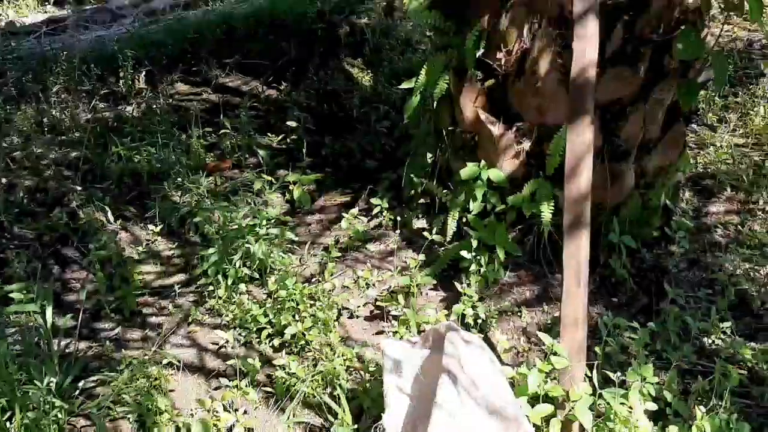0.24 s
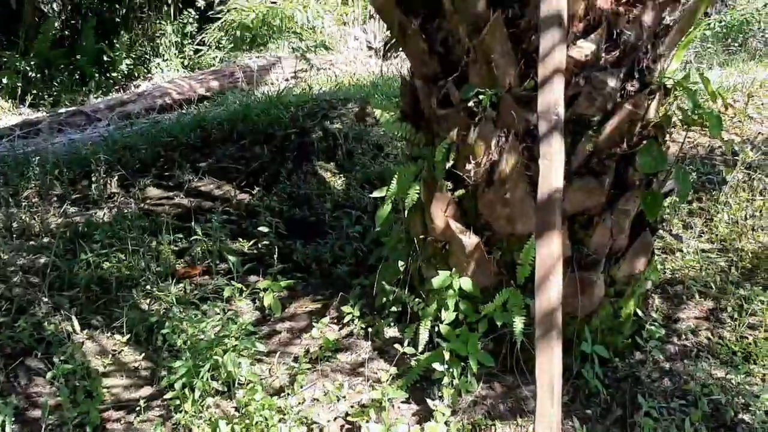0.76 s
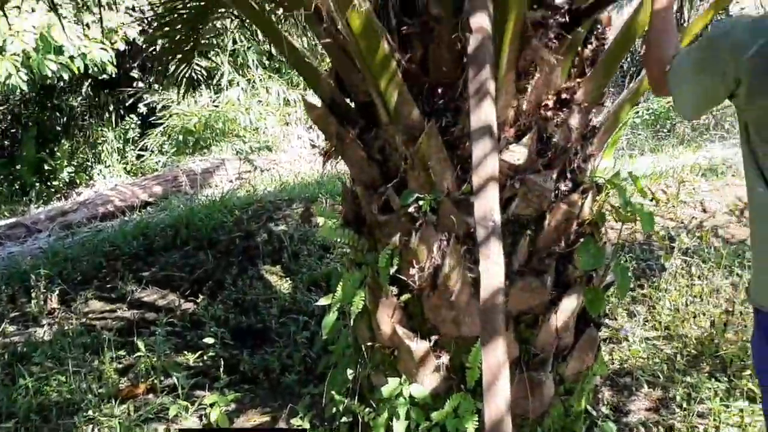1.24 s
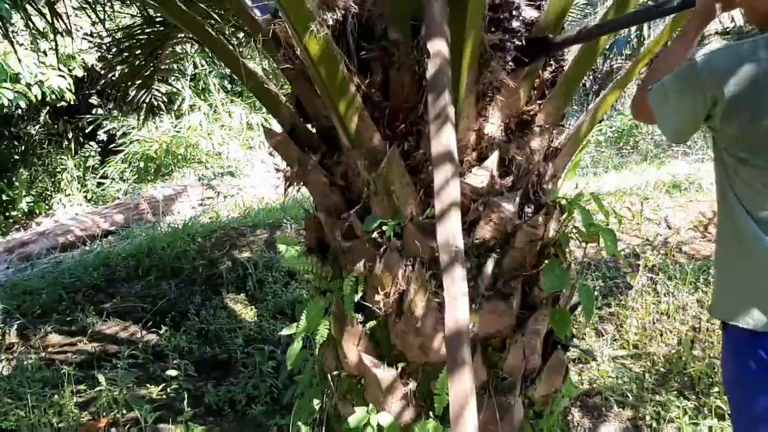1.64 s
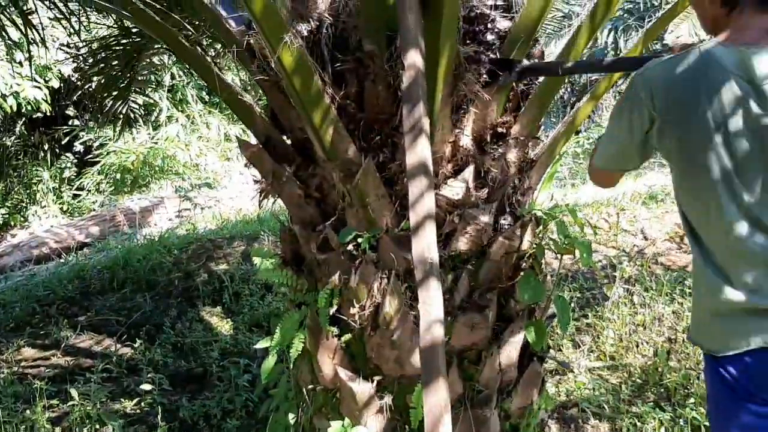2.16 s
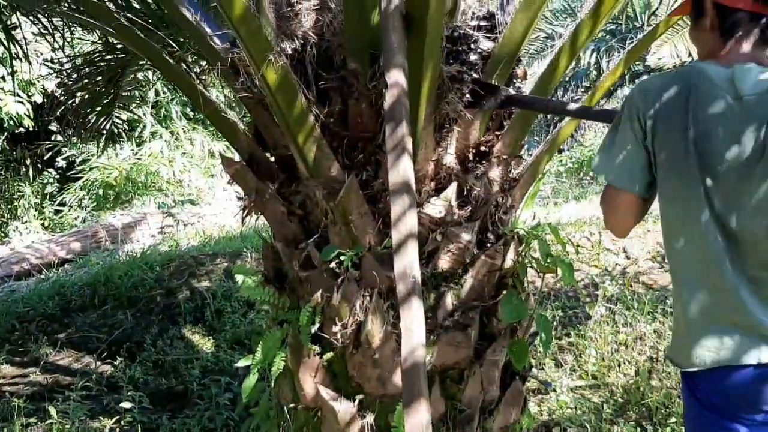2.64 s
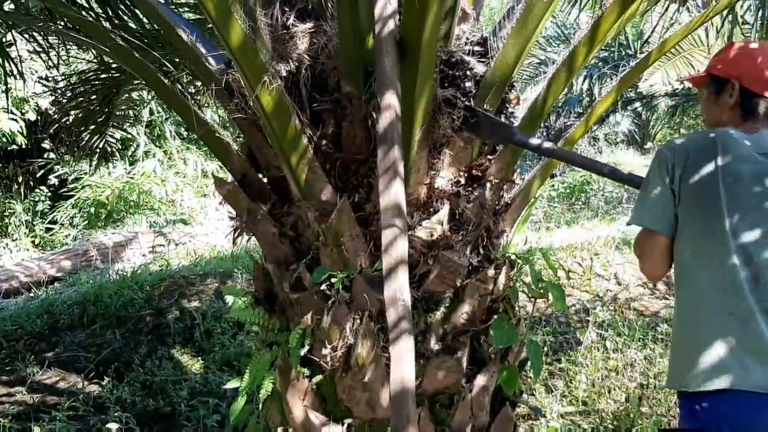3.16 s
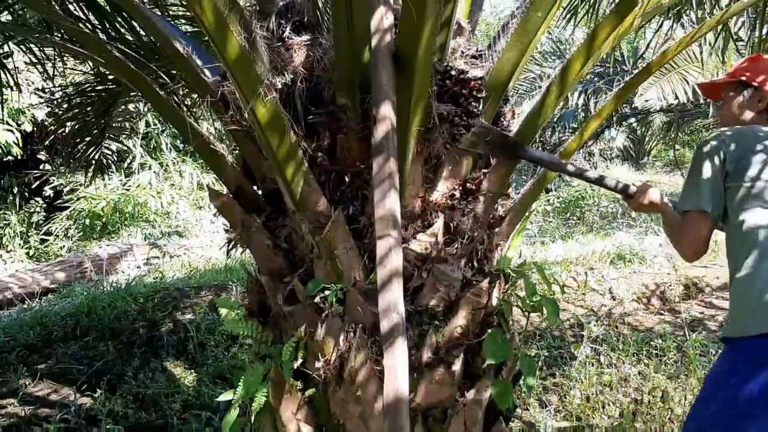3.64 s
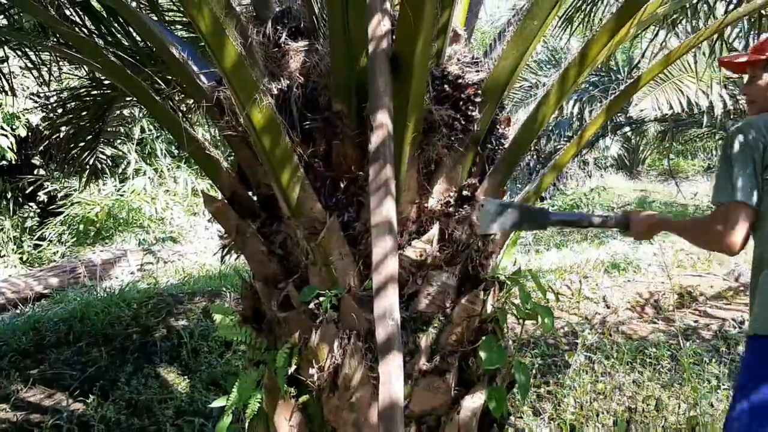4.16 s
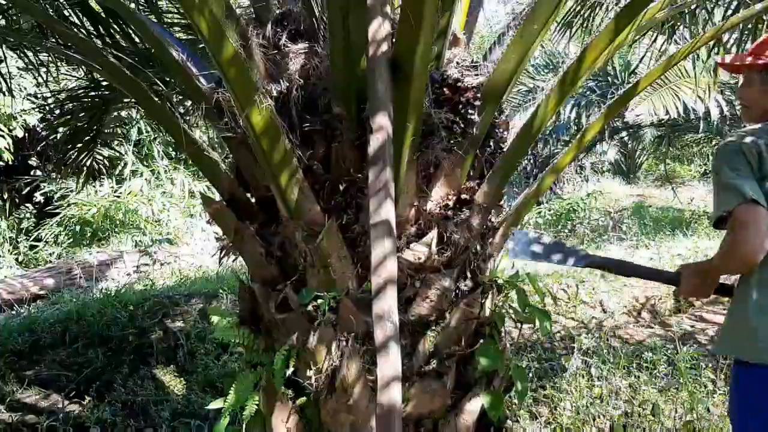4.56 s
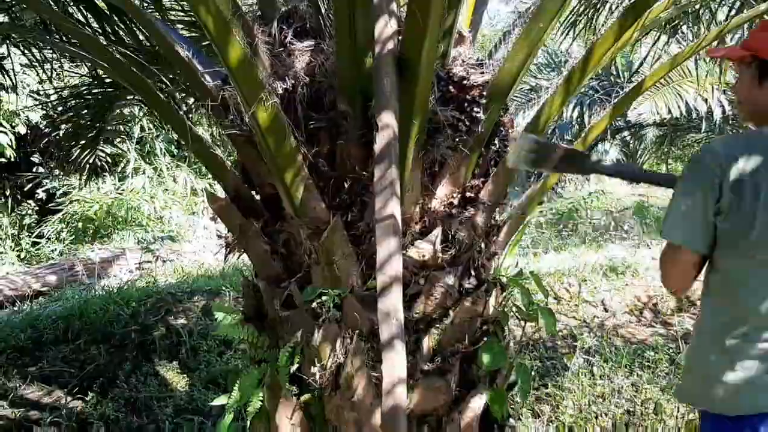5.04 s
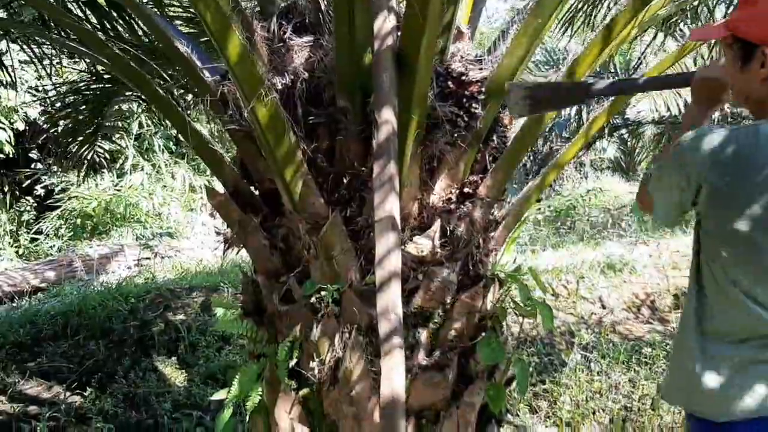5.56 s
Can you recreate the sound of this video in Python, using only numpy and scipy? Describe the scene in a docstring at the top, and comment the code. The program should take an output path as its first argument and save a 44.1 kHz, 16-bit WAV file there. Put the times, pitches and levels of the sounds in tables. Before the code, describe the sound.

Stereo outdoor sound from close to the work, insects and air leaning left. Cicadas buzz steadily over a low faraway motor that changes speed. A rough scrape comes first, then short creaks, dull thuds and clusters of sharp woody knocks with crackling fibres and shaken leaves. One hard crack follows at three and a half seconds; afterwards there are soft rustles and distant falling bird calls.

```python
"""An oil-palm plantation, heard from close by the work. First the faint insect tail of an earlier scene, noise
bands and a line, dies out. After a short gap the scene changes and the plantation cuts in at once: cicadas as
throbbing noise bands over the hiss of the air, a small distant engine as orders of its firing rate, and a far
bird's falling whistles with an echo. Close by, a steel chisel on a pole scrapes, creaks and knocks the frond
bases: clicks and slips shake filtered wood and ringing modes, while the shaken fronds rustle as dense filtered
grains."""
import sys
import numpy as np
from scipy import signal
from scipy.fft import rfft, irfft, next_fast_len
from scipy.io import wavfile
from scipy.ndimage import uniform_filter1d

SR = 44100
rng = np.random.default_rng(int(sys.argv[2]) if len(sys.argv) > 2 else 0)


def bounce(signal):
    """Save signal as a 16-bit WAV file at the path given by the first command-line argument."""
    frames = np.transpose(np.atleast_2d(signal))
    limited = np.clip(frames, -1, 1)
    pcm = np.round(limited * 32767).astype(np.int16)
    wavfile.write(sys.argv[1], SR, pcm)


N = 255780

# colour of the low shuffle of stalks, also heard under the creaks: hz, relative_density_db
SHUFFLE = [(100, -22.5), (200, 1), (350, 2.5), (800, -5.5), (1400, -18), (2500, -14)]


def amp(db):
    """Decibels to gain."""
    return 10 ** (np.asarray(db) / 20)


def evened(x):
    """Scaled to rms 1 over all channels."""
    return x / np.sqrt(np.mean(x ** 2) + 1e-30)


def read(points, hz):
    """A spectrum table read on a log-frequency axis."""
    f, value = np.transpose(points)
    return np.interp(np.log(hz + 1), np.log(f + 1), value)


def curve(rows, silent=None):
    """Columns of a table at every sample; silent is the value outside its times."""
    s, *columns = np.transpose(rows)
    return [np.interp(np.arange(N) / SR, s, c, silent, silent) for c in columns]


def sides(lr_db):
    """Left and right gains for a left-minus-right level difference."""
    return amp(np.array([[.5], [-.5]]) * lr_db)


def slow(seconds):
    """Slow random drift of rms 1: noise averaged twice over a window of this length."""
    size = round(seconds * SR)
    once = uniform_filter1d(rng.standard_normal(N), size)
    return evened(uniform_filter1d(once, size))


def band(x, hz, width):
    """A band-pass resonance applied twice."""
    sos = signal.butter(1, [hz - width / 2, hz + width / 2], "bandpass", fs=SR, output="sos")
    return signal.sosfilt(np.vstack([sos, sos]), x)


def colour(x, spectrum):
    """Causal minimum-phase filter of the given spectrum, with unit energy."""
    hz = abs(np.fft.fftfreq(4096, 1 / SR))
    log_gain = np.log(amp(np.maximum(read(spectrum, hz), -100)))
    phase = -signal.hilbert(log_gain).imag
    taps = np.fft.ifft(np.exp(log_gain + 1j * phase)).real[:2048]
    return signal.oaconvolve(x, taps / np.linalg.norm(taps))[:N]


def two_mics(first, second):
    """The microphones agree in the bass; higher up the right one hears more of the second signal."""
    # likeness of the left and right microphones: hz, likeness (0 to 1)
    same_table = [(60, .95), (300, 0.88), (700, 0.9), (1400, 0.4), (3000, 0.02), (16000, 0.025)]
    size = next_fast_len(N)
    same = np.clip(read(same_table, np.fft.rfftfreq(size, 1 / SR)), 0, 1)
    right = irfft(same * rfft(first, size) + np.sqrt(1 - same ** 2) * rfft(second, size), size)
    return np.array([first, right[:N]])


def tail():
    """A thin cricket line, wider insect bands and a little rumble, dying out."""
    # fading of the tail: start_s, level_db
    fade = [(0, -78), (.105, -91), (.138, -105)]
    # its noise bands: centre_hz, width_hz, level_db under the fade
    tail_bands = [(5500, 540, 8), (4650, 7600, -2), (1510, 440, -12), (67, 130, -18)]
    # its cricket line: pitch_hz, amplitude_db under the fade
    tail_line = (3140, 0)
    line_hz, line_db = tail_line
    bands = sum(amp(db) * evened(band(rng.standard_normal((2, N)), hz, w)) for hz, w, db in tail_bands)
    line = amp(line_db) * np.sin(2 * np.pi * line_hz * np.arange(N) / SR)
    return (bands + line) * amp(curve(fade, -200)[0])


def chorus():
    """The hiss of the air, with many cicadas on top fused into throbbing noise bands."""
    # colour of the plantation air: hz, relative_density_db
    air = [(20, -63), (45, -10), (130, -12.5), (214, -18), (450, -27), (1000, -26), (1650, -20.5),
           (2300, -24.5), (3100, -18.5), (3900, -12.5), (4600, -18), (5300, -32), (6400, -13.5), (7500, -6),
           (8800, -37), (11400, -13.5), (16000, -61)]
    # cicada bands: centre_hz, width_hz, level_db before throb, left_right_db, throb_db per unit of throb
    cicadas = [(3290, 530, -69, -3, 3.5), (5570, 330, -58, -9, 0), (7480, 820, -49, -2, 1.3),
               (11380, 1400, -72, 12.5, 3.5), (15400, 3000, -57, -3, 1.5)]
    air_db, throb_hz = -56, 25  # the throb rate wanders around this
    hiss = [colour(rng.standard_normal(N), air) for _ in "lr"]
    out = amp(air_db) * sides(-8.0) * two_mics(*hiss)
    turns = np.cumsum(throb_hz * (1 + 0.0509 * slow(0.231))) / SR
    swell = np.cos(2 * np.pi * turns + .9 * slow(.1))
    throb = swell + .8 * np.cos(4 * 2 * np.pi * turns)  # four pulses in each swell
    waver_db = .8  # singers join and drop out
    for hz, width, db, lr_db, throb_db in cicadas:
        choir = evened(band(rng.standard_normal((2, N)), hz, width))
        level_db = db + throb_db * throb + waver_db * slow(0.079)
        out = out + choir * sides(lr_db) * amp(level_db)
    return out


def sweller():
    """A noise band just under the second cicada band, rising and sinking seven times a second."""
    centre_hz, width_hz, level_db, left_right_db = 5190, 440, -64.5, -8
    swells_per_s, crest_s, depth_db = 7.0, 5.335, 5.5
    swell = np.cos(2 * np.pi * swells_per_s * (np.arange(N) / SR - crest_s))
    hiss = evened(band(rng.standard_normal((2, N)), centre_hz, width_hz))
    return hiss * sides(left_right_db) * amp(level_db + depth_db * swell)


def engine():
    """One dull thump a firing, its tone rising with speed; at idle every second firing is weak."""
    # the distant engine: start_s, firings_per_s, level_db scaling all its orders
    running = [(0.19, 16.58, -65), (0.45, 13.03, -66), (0.62, 12.27, -61), (0.72, 16.72, -59),
               (0.85, 19.63, -58), (1.4, 21.6, -59), (1.8, 20.96, -59), (3.0, 22.91, -62),
               (3.4, 21.58, -62), (3.75, 21.44, -58), (3.95, 23.65, -54), (4.3, 23.58, -54),
               (4.45, 25.66, -56), (4.85, 25.28, -55), (5.0, 23.02, -60), (5.15, 23.42, -58),
               (5.3, 25.42, -61), (5.4, 25.57, -59), (5.55, 23.72, -57), (5.8, 21.47, -54)]
    rate, level_db = curve(running)
    turns = np.cumsum(rate * (np.arange(N) >= .19 * SR)) / SR
    tone_hz = np.maximum(4.56 * rate, 82)
    drift = 1.3 + .4 * slow(.15)  # radians: a slow random drift of phase shared by all orders
    second_db = -11.5 + 2.0 * (rate - 22.5)  # the second order grows stronger as the engine runs faster
    second_phase = 2 * 2 * np.pi * turns + drift + 0.61
    thumps = amp(second_db + 2.5 * slow(0.096)) * np.cos(second_phase)
    for k in range(3, 11):
        shape_db = -45.0 * np.log2(k * rate / tone_hz) ** 2
        order_gain = amp(np.maximum(shape_db, -19.0) + 1.67 * slow(0.11))
        thumps += order_gain * np.cos(k * 2 * np.pi * turns + drift)
    weak = np.clip((16.5 - rate) / 5.3, 0, .6)
    thumps *= (1 + weak * np.cos(np.pi * turns)) * amp(level_db + 1.0 * slow(0.011))
    return two_mics(thumps, np.roll(thumps, 110)) * sides(-3.0)


def crackle(per_s, spread_db):
    """Two related click trains of rms 1: the same slips, with their own signs; a positive spread_db makes a few
    slips large, a negative one makes a few small."""
    happens = rng.random(N) < per_s / SR
    size = amp(spread_db * np.minimum(rng.exponential(1, N), 5)) * happens
    smear = np.exp(-np.arange(40) / 5.5)
    return evened(signal.oaconvolve(size, smear)[:N] * rng.standard_normal((2, N)))


def fronds():
    """Soft dense grains: a low shuffle of stalks and a brighter rustle of leaflets."""
    # shaken fronds and litter, before a random waver: start_s, shuffle_db, rustle_db
    shaking = [(0.19, -72.5, -80), (0.86, -70, -57.5), (1.0, -52, -43), (1.15, -66, -49.5),
               (1.38, -67, -60), (1.56, -53, -55), (1.65, -56, -52), (1.672, -56, -50), (1.695, -51, -55),
               (1.8, -50, -51.5), (1.86, -51.5, -49.5), (1.93, -68, -55.5), (2.1, -67, -58),
               (2.3, -49.5, -58), (2.6, -60.5, -51), (2.95, -68, -50), (3.05, -46, -47.5), (3.3, -69, -50),
               (3.63, -64.5, -48.5), (3.86, -52, -44), (3.93, -61, -44), (3.98, -54, -41.5),
               (4.1, -64, -45.5), (4.3, -69, -54), (4.7, -59, -54), (4.95, -69.5, -58), (5.79, -68, -125)]
    # colour of the leaflets: hz, relative_density_db
    leaf_colour = [(900, -7), (1550, -1.5), (2500, -1.5), (3600, 0.5), (5500, -2), (7500, 2.5),
                   (9000, -12.5), (16000, -7)]
    low_db, high_db = curve(shaking)
    low_grains = crackle(per_s=3600, spread_db=-2.0)
    low = [colour(x * amp(low_db + 1.73 * slow(0.071)), SHUFFLE) for x in low_grains]
    high_grains = crackle(per_s=8000, spread_db=1.0)
    high = [colour(x * amp(high_db + 2.0 * slow(0.023)), leaf_colour) for x in high_grains]
    return two_mics(*low) * sides(-5.5) + two_mics(*high) * sides(-6.0)


def bird():
    """Steep falling whistles, each a little off the next, with one strong echo and a haze among the trunks."""
    # calls of three notes, before the echoes: start_s, note_gap_s (start to start), level_db
    calls = [(0.195, 0.035, -47.5), (0.471, 0.035, -47.5), (2.494, 0.035, -45.5), (2.742, 0.026, -42.5),
             (4.208, .034, -44), (4.449, 0.033, -44.5), (4.721, 0.034, -43.5)]
    # the first note of a call is the weakest: level_db of each note within its call
    note_levels = [-4, 0.5, 0]
    u = np.linspace(0, 1, round(0.024 * SR))  # progress through a 24 ms note
    notes = np.zeros(N)
    for start, gap, db in calls:
        for k, note_db in enumerate(note_levels):
            hz = (5550 - 1200 * u) * (1 + .008 * rng.standard_normal())
            quaver = amp(3 * evened(uniform_filter1d(rng.standard_normal(len(u)), size=50)))
            whistle = np.sin(2 * np.pi * np.cumsum(hz) / SR)
            note = evened(whistle * np.sin(np.pi * u) ** 0.58 * quaver)
            notes[round((start + k * gap) * SR):][:len(u)] += amp(db + note_db) * note
    age = np.arange(9000) / SR
    echoes = rng.standard_normal((2, len(age))) * amp(-60 * age / .15)  # haze, 60 dB down in .15 s
    echoes *= .8 / np.linalg.norm(echoes[0])
    echoes[:, [0, 480]] = [[.62, .4], [.35, -.2]]  # left, right: direct sound and one strong echo
    return signal.oaconvolve(notes[None], echoes, axes=1)[:, :N] * sides(-8.5)


def ringing(best_hz, stretch=1):
    """Wood and steel answer one click; modes near best_hz are favoured and the grip stretches them a little."""
    # modes of the chisel and the frond base, before favour and stretch: pitch_hz, level_db, t60_s
    modes = [(665, 3, 0.045), (805, 12, 0.024), (1338, 3, 0.03), (1510, 14, 0.026), (2100, 9, 0.045),
             (3050, 2, 0.04), (3520, 9, 0.05), (4150, 8, .02)]
    t, ring = np.arange(3000) / SR, 0
    for hz, db, t60 in modes:
        favour_db = -14 * abs(np.log2(hz / best_hz))
        decay = amp(db + favour_db - 60 * t / t60)
        ring = ring + decay * np.sin(2 * np.pi * hz * stretch * t)
    return ring


def strokes():
    """Scrapes: stick-slip clicks shake the wood, ring the modes, thud into the trunk and tear bright fibres."""
    # chisel strokes: start_s, rise_s, hold_s, release_s, wood_db, trunk_thud_db, fibre_crackle_db
    scrapes = [(0.893, 0.016, 0.042, 0.04, -38, -37, -39), (1.436, 0.022, 0.07, 0.023, -46, -65, -75),
               (1.568, 0.03, 0.024, 0.15, -48, -59, -47), (1.704, 0.01, 0.0055, 0.044, -50.5, -48, -66),
               (1.743, 0.0078, 0.03, 0.045, -48, -42, -49.5), (2.302, 0.1, 0.029, 0.055, -45, -48.5, -50.5),
               (2.681, 0.0048, 0.14, 0.02, -43, -51.5, -43), (2.822, 0.016, 0.026, 0.14, -56, -46, -40),
               (3.148, 0.0071, 0.0096, 0.015, -41.5, -51, -43),
               (3.168, 0.013, 0.0067, 0.0082, -43, -39, -34.5), (3.192, 0.0061, 0.023, 0.13, -49, -46, -34),
               (3.531, 0.0013, 0.0027, 0.01, -40.5, -71, -46), (3.537, 0.01, 0.038, 0.12, -53, -59.5, -45),
               (3.741, 0.0082, 0.032, 0.13, -51, -51.5, -45.5),
               (3.78, 0.063, 0.065, 0.052, -59, -55.5, -47)]
    # colour of the shaken wood: hz, relative_density_db
    wood_colour = [(200, -8.5), (400, 0.5), (790, 7.5), (1100, 5), (1500, 2), (2600, 4), (3400, -9),
                   (6000, -19)]
    # colour of the thud in the trunk: hz, relative_density_db
    trunk_colour = [(40, -34), (110, -3), (180, 7.5), (250, -5), (330, 6.5), (600, -17)]
    # colour of the torn fibres: hz, relative_density_db
    edge_colour = [(1000, 7), (1800, 15), (3500, 22.5), (5500, 25), (7600, 15), (8600, -99), (12000, 14),
                   (16000, -51)]
    reach_db = 30.5  # a stroke rises from and falls to this far under its hold
    wood, trunk, edge = np.zeros((3, N))
    for start, rise, hold, release, wood_db, thud_db, crackle_db in scrapes:
        corners = start + np.cumsum(np.abs([0, rise, hold, release]))
        force = amp(curve(np.c_[corners, [-reach_db, 0, 0, -reach_db]], -200)[0])
        wood = wood + force * amp(wood_db)
        trunk = trunk + force * amp(thud_db)
        edge = edge + force * amp(crackle_db)
    ring = ringing(900)
    ring = amp(-5) * ring / np.linalg.norm(ring)  # the low modes stay under the wood noise
    out = []
    for clicks in crackle(per_s=7000, spread_db=-0.5):
        shaken = colour(wood * clicks, wood_colour)
        rung = signal.oaconvolve(wood * clicks, ring)[:N]
        thud = colour(trunk * clicks, trunk_colour)
        fibres = colour(edge * clicks, edge_colour)
        out.append(shaken + rung + thud + fibres)
    return two_mics(*out) * sides(-2.7)


def creaks():
    """Nearly regular slips under the blade speed up or slow down and ring the wood; strain rises and lets go."""
    # creaks of a frond base, before rate jitter and wood:
    # start_s, length_s, first_slips_per_s, last_slips_per_s, slip_s (two samples are added), level_db
    creak_rows = [(1.459, 0.072, 183.5, 292.4, 0.00022, -56), (2.115, 0.23, 66.1, 73.5, 0.00095, -73.5),
                  (2.685, .14, 230.1, 128.6, 0.00013, -51)]
    # colour of the creaking stalk: hz, relative_density_db
    stalk = [(200, -3), (550, 9), (800, 14), (1150, 2), (1550, 4), (2100, 11), (3100, 5), (5500, -6)]
    slip_jitter = .12  # share of the slip rate, rms
    slips = np.zeros(N)
    for start, length, first, last, slip_s, db in creak_rows:
        u = np.linspace(0, 1, round(length * SR))
        jitter = evened(uniform_filter1d(rng.standard_normal(len(u)), size=200))
        rate = (first + (last - first) * u) * (1 + slip_jitter * jitter)
        train = np.diff(np.floor(np.cumsum(rate) / SR), prepend=0)  # one click a slip
        train = np.convolve(train, np.hanning(round(slip_s * SR) + 2), "same")
        strain = np.sin(np.pi * u ** 1.3) ** .3
        slips[round(start * SR):][:len(u)] += amp(db) * evened(train) * strain
    body = colour(slips, stalk) + amp(-7.0) * colour(slips, SHUFFLE)
    ring = ringing(800)
    body = body + amp(-4) * signal.oaconvolve(slips, ring / np.linalg.norm(ring))[:N]
    return body * sides(-0.5)


def knocks():
    """A tick that rings briefly at its colour, a scatter off the fronds, and the ring of the wood."""
    # knocks and snaps, peaks before the left-right balance:
    # start_s, tick_peak_db, tick_colour_hz, ring_peak_db, best_hz (the blow rings best near it)
    blows = [(1.5885, -29, 4000, -38, 670), (1.7505, -31, 1400, -29, 840), (1.7629, -31, 1400, -29, 820),
             (1.8244, -22, 5000, -47, 1320), (2.362, -44, 1800, -40, 800), (2.4285, -37, 2100, -33, 780),
             (2.4375, -35, 2100, -31, 760), (2.5676, -35, 4300, -47, 550), (2.6805, -32, 4300, -34, 820),
             (2.8253, -30, 2200, -28, 850), (2.841, -26, 2800, -27, 840), (2.8617, -24, 2600, -25, 860),
             (2.9003, -31, 2800, -32, 820), (2.9784, -26, 5800, -35, 1550), (2.9815, -48, 2500, -34, 700),
             (3.1017, -31, 5400, -40, 1320), (3.1601, -24, 6800, -37, 650), (3.1789, -23, 5000, -26, 1540),
             (3.1816, -32, 3600, -23, 640), (3.1945, -23, 3700, -31, 1530), (3.2035, -22, 3600, -27, 1500),
             (3.2102, -24, 3500, -28, 1520), (3.2197, -23, 3700, -28, 1490), (3.243, -44, 2500, -34, 660),
             (3.2899, -33, 6300, -46, 1580), (3.304, -31, 6100, -47, 2140), (3.3108, -29, 4900, -38, 1520),
             (3.331, -42, 7000, -41, 1520), (3.4185, -38, 6700, -43, 1430),
             (3.5316, -15.5, 4600, -28, 1530), (3.546, -28, 5400, -38, 2060), (3.5652, -33, 5200, -43, 740),
             (3.6985, -19, 5600, -45, 1990), (3.7535, -32, 5800, -45, 1500), (3.7574, -30, 4000, -38, 1250),
             (3.785, -33, 4500, -45, 1500), (3.967, -40, 4500, -38, 3520), (3.982, -44, 3500, -38, 3520),
             (4.0, -44, 3500, -39, 3520)]
    out, t = np.zeros((2, N + 3000)), np.arange(3000) / SR
    for s, tick_db, tick_hz, ring_db, best_hz in blows:
        shared, *own = rng.standard_normal((3, len(t)))
        own = np.array(own)
        burst = (shared + .5 * own) * amp(-60 * t * tick_hz / 25)  # dull blows last longer
        burst += own * amp(-14 - 60 * t / 0.09)  # scatter off the fronds
        burst[:, 0] = 5  # the first contact
        top = min((tick_hz / 4400) ** 4, .7)  # only hard contacts reach the treble
        tick = top * band(burst, 11000, 10000)
        tick += band(burst, tick_hz, tick_hz) + 2 * band(burst, tick_hz, .3 * tick_hz)
        ring = ringing(best_hz, rng.uniform(.97, 1.03))
        ring = ring * np.minimum(t * best_hz, 1)  # builds up over one cycle
        sound = amp(tick_db) * tick / abs(tick.mean(0)).max() + amp(ring_db) * ring / abs(ring).max()
        out[:, round(s * SR):][:, :len(t)] += sound * sides(-2.0)
    return out[:, :N]


def scene():
    """The faint insect tail of an earlier scene, a short gap, then the scene changes and the plantation cuts in
    at once."""
    start_s, rise_s = .1895, 0.0013
    opening = np.clip((np.arange(N) / SR - start_s) / rise_s, 0, 1)
    far = chorus() + sweller() + engine() + bird()
    near = fronds() + strokes() + creaks() + knocks()
    return tail() + opening * (far + near)


def record(dry):
    """A steep low-pass at 15900 Hz: nothing sounds above it."""
    low_pass = signal.firwin(511, 15900, window=("kaiser", 9), fs=SR)
    return signal.oaconvolve(dry, low_pass[None], "same")


dry = scene()
out = record(dry)
bounce(out)
```